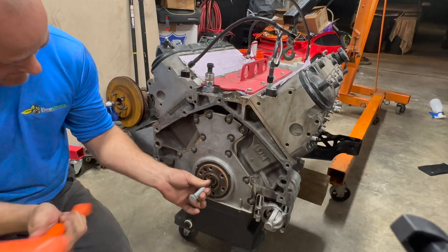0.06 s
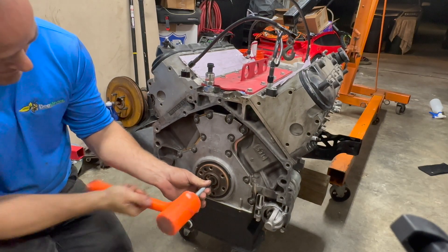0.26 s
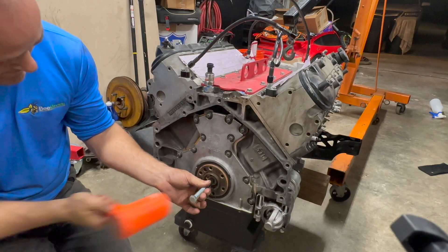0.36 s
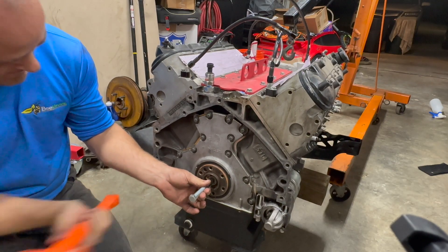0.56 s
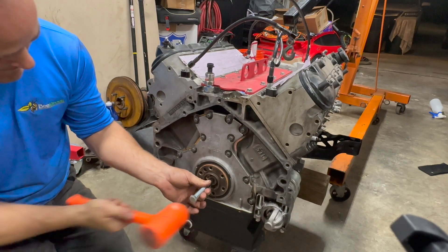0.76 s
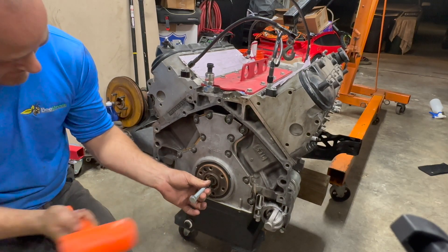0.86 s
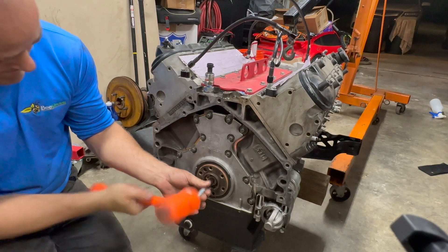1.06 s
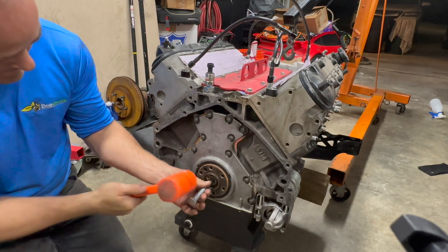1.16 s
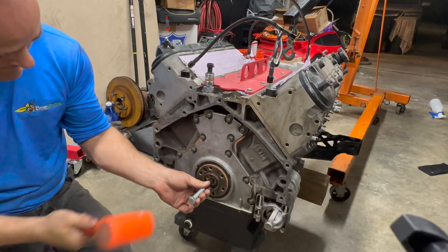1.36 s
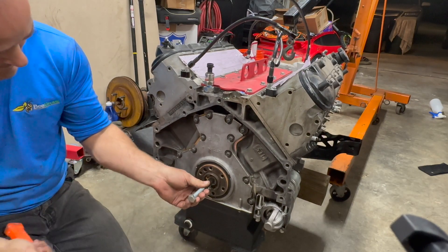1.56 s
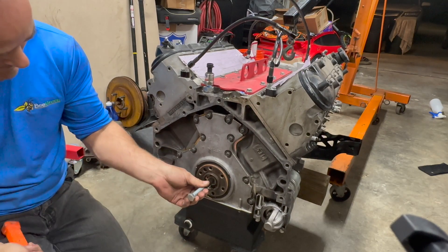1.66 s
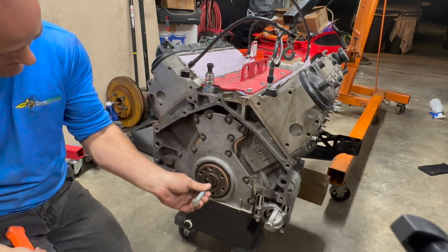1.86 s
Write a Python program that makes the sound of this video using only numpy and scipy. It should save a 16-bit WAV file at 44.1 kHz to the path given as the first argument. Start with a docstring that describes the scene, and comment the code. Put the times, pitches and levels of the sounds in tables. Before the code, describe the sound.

The tail of one mallet strike dies away, then three hard metallic knocks follow steadily, each preceded by a faint hiss of loose shot; close microphone, short bright garage echo, quiet low room rumble afterwards.

```python
"""Concrete garage: a shot-filled mallet drives a steel bolt into an engine block in four even blows,
the first heard only dying away. Cracks are shaped noise; knocks and the ring of block and stand are
dying sines; the walls answer by convolution with echoes and a noise tail. Loose shot hisses inside the
head on each swing, as random grains; filtered noise makes the air and a machine humming far off."""
import sys
import numpy as np
from scipy import signal
from scipy.fft import rfft, irfft
from scipy.io import wavfile
from scipy.ndimage import uniform_filter1d

SR = 44100
rng = np.random.default_rng(int(sys.argv[2]) if len(sys.argv) > 2 else 0)


def put_to_file(sound):
    """Save the sound as 16-bit audio at rate SR, in the file named by the first command-line argument."""
    columns = np.atleast_2d(sound).T  # one column per channel
    safe = np.clip(columns, -1, 1)
    whole_steps = np.round(safe * 32767)
    wavfile.write(sys.argv[1], SR, whole_steps.astype(np.int16))


def convert_level_to_amplitude(level_db):
    """Map a level in decibels to its linear amplitude factor."""
    exponent = np.asarray(level_db, float) / 20
    return 10 ** exponent


N = 83790  # length in samples


def evened(x):
    """Normalization: scales a signal to an rms of 1."""
    return x / np.sqrt(np.mean(x ** 2) + 1e-20)


def read(points, hz):
    """Log-frequency interpolation: reads a table of values against frequency."""
    f, value = np.transpose(points)
    return np.interp(np.log(hz + 1), np.log(f + 1), value)


def colour(x, gain):
    """Linear filtering: multiplies the spectrum by a gain given as a function of frequency."""
    n = x.shape[-1]
    return irfft(rfft(x) * gain(np.fft.rfftfreq(n, 1 / SR)), n)


def resonance(hz, centre_hz, width_hz):
    """Resonance: a gain peak whose full width is taken at half its height."""
    return 1 / (1 + (2 * (hz - centre_hz) / width_hz) ** 2)


def add(mix, s, sound):
    """Superposition: adds a sound at time s, which may lie before the start."""
    at = round(s * SR)
    sound = sound[:, max(-at, 0):]
    part = mix[:, max(at, 0):][:, :sound.shape[1]]
    part += sound[:, :part.shape[1]]


def ring(modes, t):
    """Modal superposition: each mode is a sine that decays exponentially."""
    return sum(convert_level_to_amplitude(db - 60 * t / t60) * np.sin(2 * np.pi * hz * t) for hz, db, t60 in modes)


def ports(x):
    """Spatial coherence: two close ports differ little in the bass; the extreme treble is narrowed very slightly."""
    bass_side_db, bass_hz, treble_hz = -16.5, 400, 32000

    def side_gain(hz):
        bass = (hz / bass_hz) ** 2
        return (convert_level_to_amplitude(bass_side_db) + bass) / (1 + bass) / (1 + (hz / treble_hz) ** 6)

    mid = x.mean(0)
    side = colour((x[0] - x[1]) / 2, side_gain)
    return np.array([mid + side, mid - side])


def crack_spectrum(hz):
    """Impact spectrum: gain of the crack against frequency."""
    # spectrum of the crack: f/Hz, relative level per Hz/dB
    spectrum = [(100, -40.5), (500, -7.5), (1060, -4), (2070, -0.5), (2740, -8), (4500, -9.5), (6060, -7.5),
                (8500, -10.5), (11100, -15.5), (14000, -10.5), (16000, -10.5), (17000, -49.5)]
    return convert_level_to_amplitude(read(spectrum, hz))


def crack_click(t):
    """Impulse response: the crack as one short click, used to excite the room."""
    level_db = 8.5
    click = colour(1. * (np.arange(len(t)) == 40), crack_spectrum)
    return convert_level_to_amplitude(level_db) * click / np.linalg.norm(click) * (t < .05)


def bolt_knock(t):
    """Modal impact: short-lived modes give a dull knock."""
    # modes of mallet face and bolt: f/Hz, level/dB, t60/s
    modes = [(164, -13, 0.13), (325, -12, 0.079), (427, -8.5, 0.037), (704, -7, 0.031), (1049, 3, 0.013),
             (1349, -5, 0.023), (1920, -18, .012), (2580, -3, 0.014), (3330, -11.5, 0.023)]
    rise_s = 0.00028
    return ring(modes, t) * (1 - np.exp(-t / rise_s))


def block_ring(t):
    """Modal decay and beating: the block rings on; a stand tone and its neighbour start opposed."""
    # modes of the block: f/Hz, level/dB, t60/s
    modes = [(276.6, -35.5, 0.84), (317.5, -22, 0.38), (347, -29, 0.74), (400, -35, 0.81),
             (438, -24.5, 0.21), (498.5, -17, 0.14), (597, -20, 0.24), (840, -26, 0.39), (973, -44, 1.07),
             (1156, -21, 0.29), (1207, -28.5, 0.5), (1297, -27.5, 0.23), (1295, -29.5, 0.62),
             (1451, -30, 0.24), (1481, -27, 0.37), (2215, -24, 0.25), (2620, -44.5, .4)]
    # long tone of the stand: f/Hz, level/dB, t60/s
    stand = [(218.1, -12.5, 0.58)]
    # its short neighbour, subtracted so that the hum swells and throbs once: f/Hz, level/dB, t60/s
    partner = [(235, -14.5, 0.14)]
    rise_s, side_db, side_ahead_s = 0.0035, -12.5, 0.00088

    def body(u):
        return ring(modes, u) + ring(stand, u) - ring(partner, u)

    mid = body(t)
    side = convert_level_to_amplitude(side_db) * body(t + side_ahead_s)
    return np.array([mid + side, mid - side]) * (1 - np.exp(-t / rise_s))


def bass_lag(x):
    """Dispersion: a phase shift delays frequency f by 1.186 / (f + 60) seconds, the bass most."""
    return colour(x, lambda hz: np.exp(-2j * np.pi * 1.186 * np.log(1 + hz / 60)))


def garage(n):
    """Reverberation: blurred single echoes, then a dense tail with a fast and a slow decay."""
    # reflections from walls and floor, before colouring: delay t/s, left level/dB, right level/dB
    echoes = [(.0085, -15.5, -17), (.0135, -11.5, -13), (.020, -12.5, -15), (.026, -20.5, -12.5)]
    # fast decay of the tail: f/Hz, t60/s
    decay = [(100, 0.95), (260, 0.38), (700, 0.43), (1840, 0.33), (4850, 0.37), (12800, 0.27)]
    # colour of echoes and tail: f/Hz, gain level/dB
    tone = [(150, -33), (300, -8.5), (500, 4), (1000, -1), (3000, -1.5), (5500, 1.5), (8000, -5.5),
            (10200, -1.5), (10600, -51.5), (12400, -51.5), (12800, -9.5), (15200, -8.5), (16000, -36)]
    wet_db, late_db, late_stretch, blur_t60_s = 3.5, -29, 2.48, .012

    hz, t, z = signal.stft(rng.standard_normal((2, n)), SR, nperseg=256)
    fall_db = -60 * t / read(decay, hz)[:, None]
    z = z * (convert_level_to_amplitude(fall_db) + convert_level_to_amplitude(late_db + fall_db / late_stretch))
    build_up = np.clip(np.arange(n) / SR / 0.0072 - .2, 0, 1)  # silent at first, full after 8.6 ms
    tail = signal.istft(z, SR, nperseg=256)[1][:, :n] * build_up
    path = convert_level_to_amplitude(wet_db) * tail / np.linalg.norm(tail[0])
    for s, *db in echoes:
        blur = rng.standard_normal((2, 600)) * convert_level_to_amplitude(-60 * np.arange(600) / SR / blur_t60_s)
        blur = blur / np.linalg.norm(blur, axis=1, keepdims=True)
        add(path, s, convert_level_to_amplitude(np.array(db))[:, None] * blur)
    return colour(path, lambda f: convert_level_to_amplitude(read(tone, f)))


def blows():
    """Impact and convolution: crack and knock, direct and through the garage, plus the block's ring."""
    # the four blows: t/s, force level/dB, crack level/dB before the force
    strikes = [(-.213, -6, 8), (0.2175, -5.5, 5), (0.6463, -6.5, 6), (1.0790, -8, 9)]
    crack_t60_s, crack_rise_s, knock_wet_db, port_s = 0.0078, 0.00088, -5.5, .00025
    alike = 0.87  # share of a common noise and room response in every blow

    t = np.arange(SR) / SR
    short = t[:8192]
    lead = round(port_s * SR)
    unlike = np.sqrt(1 - alike ** 2)
    click, knock, block = crack_click(short), bolt_knock(short), block_ring(t)
    shared_noise, shared_path = rng.standard_normal(len(short)), garage(SR)
    out = np.zeros((2, N))
    for s, force_db, bright_db in strikes:
        noise = alike * shared_noise + unlike * rng.standard_normal(len(short))
        noise = evened(colour(noise, crack_spectrum))
        crack = noise * convert_level_to_amplitude(bright_db - 60 * short / crack_t60_s) * np.minimum(short / crack_rise_s, 1)
        path = alike * shared_path + unlike * garage(SR)
        source = bass_lag(convert_level_to_amplitude(bright_db) * click + convert_level_to_amplitude(knock_wet_db) * knock)
        sound = signal.fftconvolve(source[None], path, axes=1)[:, :SR]
        tick, thud = bass_lag(np.array([crack, knock]))[:, :6000]
        # the crack reaches the right port first, the knock the left
        left = np.pad(tick, (lead, 0)) + np.pad(thud, (0, lead))
        right = np.pad(tick, (0, lead)) + np.pad(thud, (lead, 0))
        add(sound, 0, np.array([left, right]))
        heard = ports(np.pad(sound, ((0, 0), (441, 0))))[:, 441:]  # padded against filter wrap-around
        add(out, s, convert_level_to_amplitude(force_db) * (heard + block))
    return out


def shot():
    """Granular noise and cavity resonance: dense small grains rattle in the hollow head on each swing."""
    # swings of the mallet: loudest moment t/s, level/dB
    swings = [(.005, -61.5), (0.162, -42.5), (0.582, -44), (1.017, -44.5)]
    # course of the slide: t/s from the loudest moment, level/dB
    slide = [(-.13, -64), (-.08, -21.5), (-.03, -11.5), (0, -2.5), (0.022, -14), (0.047, -9),
             (0.071, -24.5)]
    # spectrum of the shot: f/Hz, relative level per Hz/dB
    spectrum = [(290, -24), (500, -7), (1530, -18.5), (6320, -6), (9840, -14.5), (11700, -54), (12600, -16),
                (14900, -11.5), (16000, -17.5), (17000, -76.5)]
    hollow_hz, hollow_width_hz, hollow_db = 2360, 900, -7.5
    grains_per_s, spread_db = 7700, 3

    t = np.arange(N) / SR
    struck = rng.random((2, N)) < grains_per_s / SR
    size = convert_level_to_amplitude(spread_db * rng.exponential(1, (2, N))) * struck
    grains = size * rng.standard_normal((2, N)) + .5 * rng.standard_normal((2, N))
    hiss = evened(colour(grains, lambda hz: convert_level_to_amplitude(read(spectrum, hz))))
    hollow = evened(colour(grains, lambda hz: resonance(hz, hollow_hz, hollow_width_hz)))
    at, shape_db = np.transpose(slide)
    level = sum(convert_level_to_amplitude(db + np.interp(t - s, at, shape_db, -90, -90)) for s, db in swings)
    return level * ports(hiss + convert_level_to_amplitude(hollow_db) * hollow)


def air():
    """Partly coherent noise: the low rumble and hiss of the garage, its spectrum gently lumpy."""
    # background spectrum: f/Hz, relative level per Hz/dB
    spectrum = [(15, -49.5), (25, -49.5), (96, -4.5), (169, -26.5), (187, -30), (225, -25.5), (314, -31),
                (954, -34.5), (2130, -44.5), (4860, -52.5), (12000, -65.5), (15600, -99), (22000, -120)]
    # left-right likeness: f/Hz, correlation (-1 to 1)
    likeness = [(60, 0.94), (240, 1), (950, 0.43), (3770, 0.087), (15000, -0.69)]
    level_db, lump_db = -55.5, 1

    frames, hz = N // 512 + 5, np.fft.rfftfreq(2048, 1 / SR)
    a, b, c, d, lumps = rng.standard_normal((frames, 1025, 5)).T
    lumps = uniform_filter1d(lumps, size=9, axis=0)  # over frequency
    lumps = evened(uniform_filter1d(lumps, size=4, axis=1))  # over time
    same = np.clip(read(likeness, hz), -1, 1)[:, None]
    left = a + 1j * b
    right = same * left + np.sqrt(1 - same ** 2) * (c + 1j * d)
    z = np.array([left, right]) * convert_level_to_amplitude(read(spectrum, hz)[:, None] + lump_db * lumps)
    return convert_level_to_amplitude(level_db) * evened(signal.istft(z, nperseg=2048, noverlap=1536)[1][:, :N])


def machine_hum():
    """Narrow-band noise: two faint tones of a far machine waver as narrow bands of noise do."""
    # faint tones: f/Hz, width/Hz, rms level/dB
    tones = [(979, 8, -78), (4759, 40, -84)]
    out = np.zeros((2, N))
    for tone_hz, width_hz, db in tones:
        noise = rng.standard_normal((2, N))
        out += convert_level_to_amplitude(db) * evened(colour(noise, lambda f: resonance(f, tone_hz, width_hz)))
    return out


def scene():
    """Superposition: blows, sliding shot, air and far machine sum linearly."""
    return blows() + shot() + air() + machine_hum()


def roll_off(x):
    """The treble ends steeply here."""
    return signal.sosfilt(signal.butter(12, 17140, fs=SR, output="sos"), x)


def record(dry):
    """High-pass and saturation: the microphone drops deep bass and rounds off the highest peaks."""
    low_hz, ceiling = 74, 0.8
    thin = signal.sosfilt(signal.butter(3, low_hz, "high", fs=SR, output="sos"), dry)
    mix = ceiling * np.tanh(thin / ceiling)
    return roll_off(mix)


dry = scene()
out = record(dry)
put_to_file(out)
```